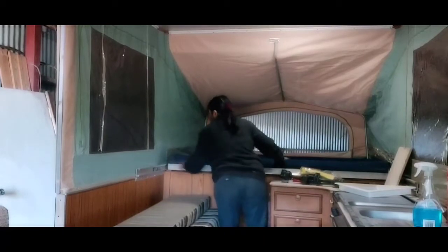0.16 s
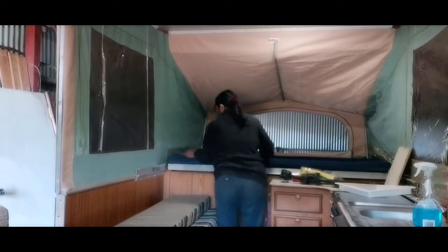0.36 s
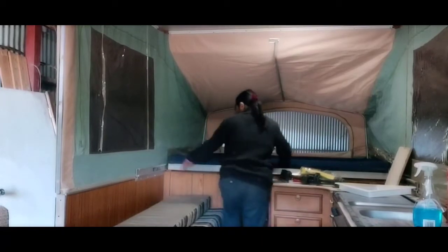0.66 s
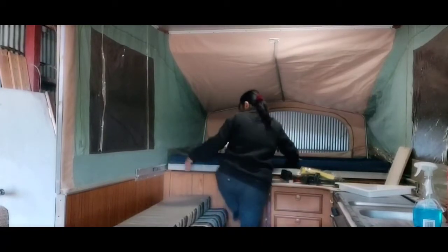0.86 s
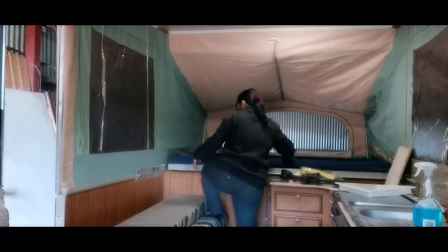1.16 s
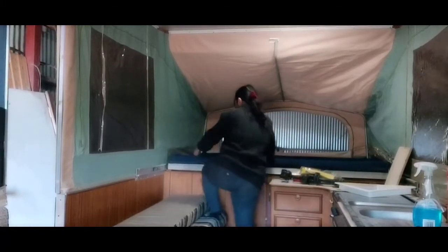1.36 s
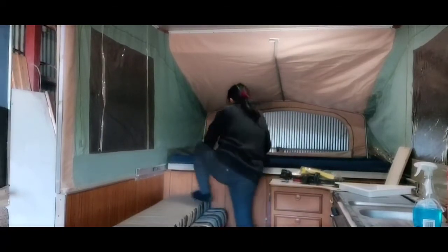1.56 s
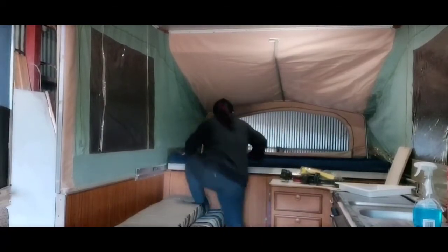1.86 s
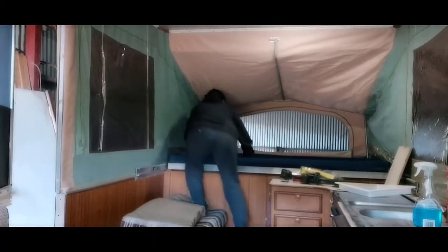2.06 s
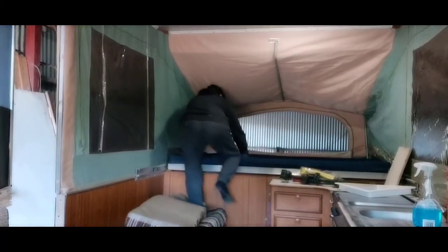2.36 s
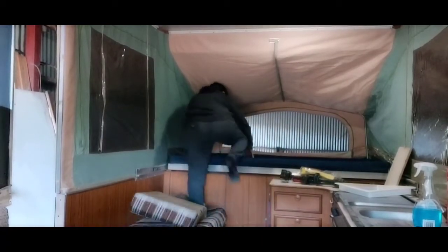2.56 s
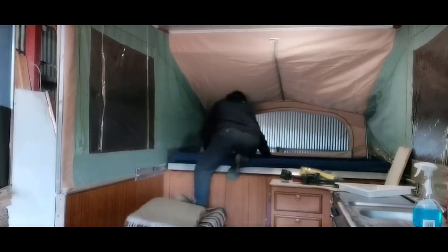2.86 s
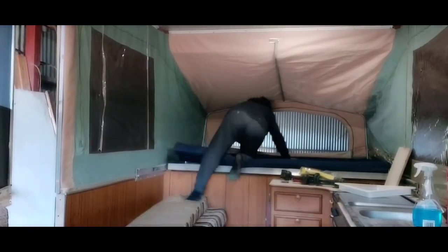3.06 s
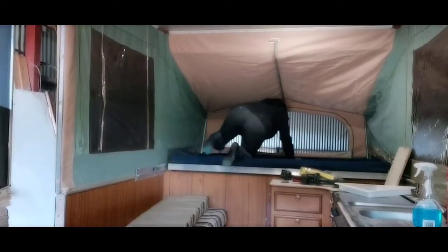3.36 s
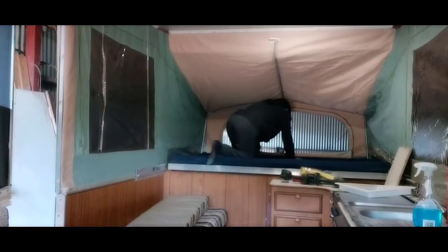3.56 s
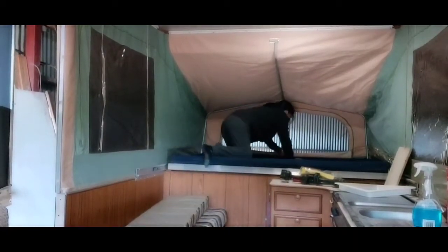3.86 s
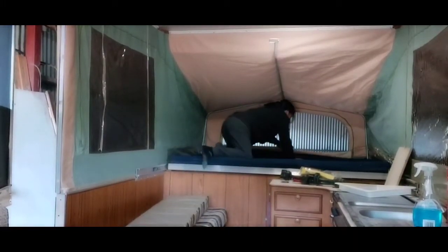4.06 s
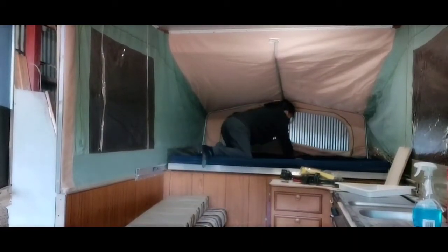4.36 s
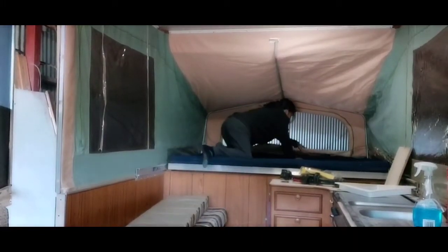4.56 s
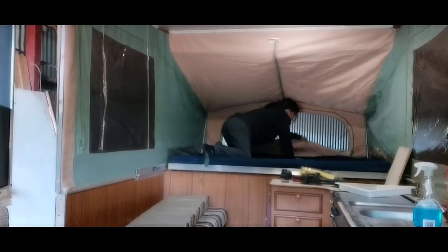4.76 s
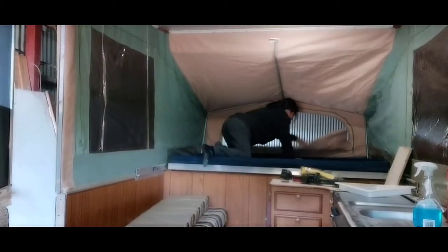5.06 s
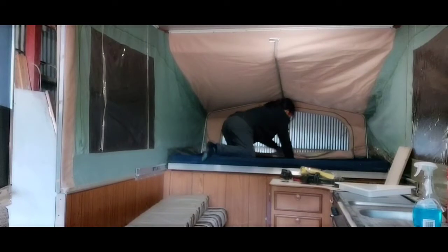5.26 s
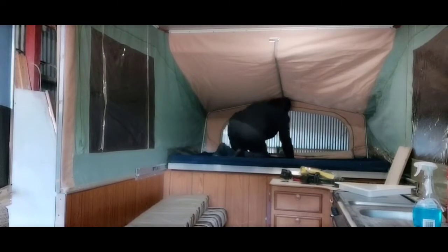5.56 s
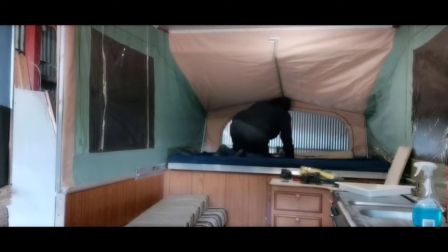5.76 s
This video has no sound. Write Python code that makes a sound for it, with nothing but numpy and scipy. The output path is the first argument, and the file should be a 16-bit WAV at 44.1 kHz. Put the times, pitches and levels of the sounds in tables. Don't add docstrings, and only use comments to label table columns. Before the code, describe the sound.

Knees and hands bump hollow plywood, clothes rustle and fittings snap in a padded cabin, with low wind bursts strongest early on.

```python
import sys
import numpy as np
from scipy import signal
from scipy.fft import rfft, irfft
from scipy.io import wavfile
from scipy.ndimage import uniform_filter1d

SR = 44100
rng = np.random.default_rng(int(sys.argv[2]) if len(sys.argv) > 2 else 0)


def wav_out(sig):
    wavfile.write(sys.argv[1], SR, np.round(np.clip(np.atleast_2d(sig).T, -1, 1) * 32767).astype(np.int16))


def nominal_scale(level):
    x = np.asarray(level, float) / 20
    return 10 ** x


N = 261072
TIME = np.arange(N) / SR
SHARED_BELOW_HZ = 910


def level(x, db):
    return x * nominal_scale(db) / np.sqrt(np.mean(x ** 2))


def band(x, lo_hz, hi_hz, order=2):
    edges_hz = [lo_hz, min(hi_hz, 0.45 * SR)]
    return signal.sosfilt(signal.butter(order, edges_hz, "band", fs=SR, output="sos"), x)


def add(out, sound, start_s):
    i = max(int(start_s * SR), 0)
    out[..., i:i + sound.shape[-1]] += sound[..., :N - i]


def decay(t, t60_s):
    return 1000 ** (-t / t60_s)


def walk(rate_hz):
    hold = int(SR / rate_hz)
    steps = np.repeat(rng.standard_normal(N // hold + 1), hold)
    return 1.3 * uniform_filter1d(uniform_filter1d(steps, hold), hold)[:N]


def diffuse(samples, alike=0.91):
    mid, side = rfft(rng.standard_normal((2, samples)))
    hz = np.arange(len(mid)) * SR / samples
    like = np.clip(alike, 0, 1) / (1 + (hz / SHARED_BELOW_HZ) ** 4)
    mid, side = mid * np.sqrt(1 + like), side * np.sqrt(1 - like)
    return irfft(np.array([mid + side, mid - side]), samples) / np.sqrt(2)


def sparse(per_s, sizes, fade_s):
    clicks = (rng.random(N) < per_s / SR) * sizes
    return signal.lfilter([1], [1, -np.exp(-1 / (fade_s * SR))], clicks)


# peak_s, peak_db, panel_hz
THUMP_BLOWS = [(0.2353, -28.5, 300), (0.258, -24.5, 120), (0.272, -28, 131), (0.301, -29.5, 125),
               (0.321, -37, 136), (0.379, -35, 130), (1.124, -35, 180), (1.143, -22, 170),
               (1.166, -21.5, 150), (1.212, -28, 120), (1.24, -28.5, 118), (1.581, -33, 145),
               (1.938, -46, 172), (1.959, -33.5, 228), (2.61, -22.5, 142), (2.623, -27.5, 135),
               (2.874, -35.5, 140), (2.924, -31, 201), (2.956, -31.5, 161), (3.014, -29.5, 182),
               (3.05, -40, 150), (5.045, -31.5, 168), (3.231, -29, 230), (3.25, -32, 201),
               (2.907, -36, 200), (3.69, -27.5, 174), (3.708, -32, 160), (3.735, -35, 150),
               (3.823, -32, 135), (3.843, -32, 147), (4.017, -32.5, 165), (5.03, -35.5, 200),
               (5.065, -32, 205), (5.346, -29.5, 239), (5.617, -33, 130), (5.578, -40, 120),
               (5.64, -37, 120)]
# mode_hz, level_db, t60_s
BUNK_MODES = [
    (118, -2, 0.18),
    (170, -4, 0.24),
    (274, -10, 0.12),
    (334, -13, 0.21),
    (426, -18, 0.092),
    (623, -34, .04),
    (820, -33, .04),
]


def thumps(own_t60_s=0.07, push_cycles=0.38, bunk_db=-4):
    out, t = np.zeros(N), np.arange(int(0.2 * SR)) / SR
    for peak_s, peak_db, panel_hz in THUMP_BLOWS:
        ring = np.sin(2 * np.pi * panel_hz * t) * decay(t, own_t60_s)
        for mode_hz, mode_db, t60_s in BUNK_MODES:
            detune, spread = rng.standard_normal(2)
            tone = np.sin(2 * np.pi * mode_hz * (1 + 0.052 * detune) * t)
            ring += nominal_scale(mode_db + bunk_db + 3 * spread) * tone * decay(t, t60_s)
        push = np.hanning(int(push_cycles * SR / panel_hz) + 3)
        ring = np.convolve(ring, push)
        add(out, -ring * nominal_scale(peak_db) / np.abs(ring).max(), peak_s - 0.661 / panel_hz)
    return np.array([out, out])


# peak_s, peak_db, swell_s, fade_s, heaviness_db
CLIMBING_CLOTH = [(0, -55.5, .1, .25, 2), (.146, -59.5, 0.22, .12, -1), (.27, -54, .06, 0.3, -1.5),
                  (.38, -55.5, .3, 0.13, 0.5), (.48, -58.5, 0.097, 0.37, 0), (.58, -58, 0.23, 0.1, 0.5),
                  (0.722, -59, 0.1, 0.094, 3.5), (1.165, -49.5, 0.05, 0.099, 4),
                  (1.185, -59, .02, 0.053, 12), (1.37, -65, 0.18, 0.14, 0), (1.53, -61, 0.096, 0.37, -17),
                  (1.62, -56, 0.24, 0.15, -1), (1.687, -51.5, 0.032, 0.083, -13),
                  (1.724, -51, 0.085, 0.057, -8), (2.0, -56, 0.14, 0.061, 4),
                  (2.08, -58.5, 0.044, 0.036, 1), (2.5, -71, 0.2, .4, -3), (2.66, -68, 0.4, 0.069, 4.5),
                  (2.89, -58, .03, .3, -8), (2.97, -46, 0.038, 0.12, 0), (3.23, -48, 0.14, 0.063, -2.5),
                  (3.35, -65.5, .1, 0.072, -7)]
# peak_s, peak_db, swell_s, fade_s, heaviness_db
CRAWLING_CLOTH = [(3.71, -61, 0.025, 0.069, 4), (3.75, -57.5, 0.049, 0.08, 0),
                  (3.86, -58.5, 0.13, 0.055, 5.5), (3.99, -53.5, 0.052, 0.12, 7),
                  (4.21, -60, 0.33, 0.15, 0), (4.31, -53, 0.15, 0.077, 1.5), (4.42, -66.5, .15, 0.13, 0),
                  (4.65, -67, .15, 0.14, -3), (4.55, -56, 0.12, 0.072, 3), (4.77, -60.5, 0.13, 0.16, 0),
                  (4.93, -55, 0.16, 0.25, -0.5), (5.04, -58.5, 0.19, 0.11, 6), (5.24, -52, 0.078, 0.14, 0),
                  (5.375, -49.5, 0.043, .1, 3), (5.42, -39.5, 0.086, 0.091, -1),
                  (5.47, -46, .08, 0.055, -5), (5.6, -60, 0.18, 0.064, -2), (5.74, -57, 0.044, .2, 2),
                  (5.81, -53.5, 0.074, 0.075, 4.5), (5.92, -57, 0.16, .2, -0.5)]


def cloth(heavy_share, offset_db):
    swell_depth_db, still_db, still_heavy_db = 17.5, -73, 4
    roundness = 1.11
    peak_s, peak_db, swell_s, fade_s, heavy_db = np.transpose(CLIMBING_CLOTH + CRAWLING_CLOTH)[..., None]
    coarse_time = TIME[::64]
    t = coarse_time - peak_s
    away = np.where(t < 0, -t / np.maximum(swell_s, 0.01), t / np.maximum(fade_s, 0.01))
    moves_db = peak_db + heavy_share * heavy_db - swell_depth_db * away ** roundness
    power = np.sum(nominal_scale(2 * moves_db), axis=0) + nominal_scale(2 * (still_db + heavy_share * still_heavy_db))
    return np.interp(TIME, coarse_time, 10 * np.log10(power) + offset_db)


# centre_hz, level_db
CREASE_RINGS = [
    (1050, -14),
    (1500, -10.5),
    (2000, -10),
    (2500, -9.5),
    (2900, -9.5),
    (3600, -11.5),
    (4900, -13),
    (6000, -13),
]


def rustle(grain_db=2.5, smooth_db=8.0, patchy_db=1.5):
    drag_db = cloth(0, 0)
    folds_db = cloth(0.92, 0) - drag_db
    weave_db = cloth(-0.28, -0.5) - drag_db
    clicks = sparse(900, nominal_scale(grain_db * rng.exponential(size=N)), 0.0043)
    catching = level(clicks, 0) + nominal_scale(smooth_db)

    def fibres():
        noise = diffuse(N, alike=1.0) * catching * nominal_scale(patchy_db * walk(25))
        return signal.lfilter([1], [1, -0.6], noise)

    out = level(band(fibres(), 990, 2750, order=4), -3.0) * nominal_scale(folds_db)
    out += level(band(fibres(), 2050, 6550, order=3), -3.0)
    out += level(band(fibres(), 6400, 21200), -0.88) * nominal_scale(weave_db)
    flip_db = -5 + 0.12 * (drag_db + 52.5)
    for centre_hz, crease_db in CREASE_RINGS:
        burst = sparse(50, nominal_scale(2.5 * rng.standard_normal(N)), 0.009)
        noise = rng.standard_normal((2, N)) * burst
        fleck = level(band(noise, centre_hz / 1.04, centre_hz * 1.04, order=1), crease_db)
        out += fleck * nominal_scale(folds_db * (centre_hz < 2300) + flip_db)
    return out * nominal_scale(drag_db)


# left_late_s, right_late_s, level_db
WALL_ECHOES = [
    (.0021, .0024, -5),
    (.0047, 0.0038, -5),
    (.0073, .0080, -8),
    (0.0116, 0.011, -10),
]


def cabin(x):
    out = x.copy()
    for *late_s, db in WALL_ECHOES:
        sway_s = 0.0002 * walk(1.5)
        echo = [np.interp(TIME - s - sway_s, TIME, port) for s, port in zip(late_s, x)]
        out += nominal_scale(db) * np.array(echo)
    return out / np.sqrt(1 + sum(nominal_scale(2 * db) for *_, db in WALL_ECHOES))


# start_s, peak_db, centre_hz, treble_share_db, t60_s
HARD_SNAPS = [(0.226, -33, 767, -45, 0.1), (.229, -41.5, 2980, -12, .06), (1.142, -43, 1100, -6, 0.068),
              (1.159, -33, 1980, -11, 0.089), (1.179, -42, 1700, -16, 0.056), (1.99, -35, 3600, -31, 0.046),
              (2.064, -32, 3100, -32, 0.05), (2.486, -55, 1500, 0, 0.051), (2.601, -45, 810, -29, 0.062),
              (2.647, -50, 5600, -22, 0.063), (2.873, -53, 813, 10, 0.036), (2.958, -23, 3700, -39, 0.05),
              (2.958, -35, 1090, -40, 0.066), (3.119, -55.5, 947, 14, 0.04), (3.705, -49, 980, -29, 0.052),
              (3.807, -51.5, 1050, 6, 0.035), (3.947, -48, 1800, -24, 0.08), (3.964, -45, 2300, -17, .06),
              (3.977, -40, 1470, -19, 0.04), (4.008, -42, 2200, -13, 0.056), (4.128, -50, 1510, -24, 0.04),
              (4.224, -65, 1570, 0, 0.063), (4.743, -45.5, 3300, -4, 0.065), (4.787, -45, 2580, -6, 0.12),
              (5.013, -40.5, 1150, -19, 0.12), (5.2, -47, 3030, -14, 0.06), (5.346, -41.5, 2300, -33, 0.09),
              (5.728, -53, 2840, 3, 0.074), (5.791, -41.5, 2880, -15, 0.076)]
# start_s, peak_db, centre_hz, treble_share_db, t60_s
DULL_KNOCKS = [(1.25, -49, 330, -45, 0.11), (3.3, -47.5, 690, -30, .15), (4.3, -50, 650, -30, 0.1),
               (3.835, -47, 640, -30, 0.19), (3.975, -50, 690, -45, 0.31), (.27, -50, 690, -45, 0.46),
               (.5, -51, 690, -45, 0.58), (1.96, -47.5, 690, -45, .2), (1.735, -43.5, 550, -43, 0.08),
               (1.745, -42, 260, -43, 0.079), (2.27, -40, 160, -45, 0.11), (1.95, -41.5, 360, -45, 0.24),
               (2.988, -38.5, 390, -45, 0.19), (3.225, -45, 550, -45, 0.19), (4.91, -43, 243, -45, 0.11),
               (2.603, -41.5, 390, -45, .06), (4.535, -41, 202, -45, 0.17), (4.568, -40.5, 235, -45, 0.066),
               (3.7, -41.5, 340, -44.5, 0.16), (1.153, -37, 610, -45, 0.15), (5.885, -41, 270, -45, 0.12)]


def snaps(width=1.385, tail_db=-18, tail_t60_s=0.31):
    out, t = np.zeros((2, N)), np.arange(int(0.25 * SR)) / SR
    for start_s, peak_db, centre_hz, treble_db, t60_s in HARD_SNAPS + DULL_KNOCKS:
        noise = diffuse(len(t))
        body = band(noise, centre_hz / width, centre_hz * width, order=1 + (centre_hz < 700))
        edge = band(noise, 1700, 17000)
        colour = level(body, 0) + level(edge, treble_db + 0.5)
        fade = decay(t, max(t60_s, 0.005)) + nominal_scale(tail_db) * decay(t, tail_t60_s)
        rise = 1 - np.exp(-t / (0.001 + 0.87 / centre_hz))
        add(out, nominal_scale(peak_db - 3.0) * colour * fade * rise, start_s)
    return out


# start_s, pitch_hz, level_db, t60_s
FITTING_RINGS = [
    (.2275, 1050, -27, 0.02),
    (.2255, 803, -29.5, 0.034),
    (0.2255, 1820, -28.5, 0.024),
    (2.9575, 820, -37.5, 0.047),
    (2.9587, 1750, -38.5, 0.036),
    (2.9, 870, -47.5, .03),
    (5.3477, 510, -36.5, 0.027),
    (2.964, 2690, -40.5, 0.09),
    (2.9597, 3480, -36, 0.03),
]
# start_s,
# pitch_hz, level_db, t60_s
SHORT_RINGS = [(5.3505, 1700, -42, 0.027), (5.356, 1970, -42, .02), (5.368, 2700, -41, .02),
               (5.375, 2800, -38, .025), (5.381, 2750, -42, .02), (5.391, 2700, -36, .025),
               (5.4, 1700, -37, .02), (5.411, 2250, -41, .02), (5.417, 3300, -39, .02),
               (5.423, 2100, -40, .02), (5.425, 4700, -44, .02), (5.449, 2000, -46, .03),
               (4.791, 1550, -46, 0.044), (4.3, 2200, -46, 0.046), (5.042, 1800, -46, 0.027),
               (4.972, 1280, -50, .04), (2.974, 3150, -46, .06), (1.162, 3050, -39.5, .03),
               (1.168, 2200, -42, 0.036), (1.164, 1500, -43, .03), (1.188, 1200, -41, .03),
               (.243, 1400, -45, 0.035), (.259, 1700, -51, .05), (.2265, 330, -32, 0.026),
               (.2275, 520, -31, 0.028), (5.364, 300, -38, .02), (4.29, 2700, -49, .03),
               (4.545, 2350, -49.5, .03), (5.1, 2100, -48, 0.033), (5.433, 3300, -44, 0.018),
               (5.44, 6900, -46, .02), (1.972, 900, -46, 0.034)]


def rings():
    out, t = np.zeros((2, N)), np.arange(int(0.25 * SR)) / SR
    for start_s, pitch_hz, db, t60_s in FITTING_RINGS + SHORT_RINGS:
        rise = np.sin(np.pi / 2 * np.minimum(t * pitch_hz / 1.95, 1)) ** 2
        port_phase = np.array([[0], [pitch_hz / 2500]])
        tone = np.sin(2 * np.pi * pitch_hz * t + port_phase)
        add(out, nominal_scale(db + 2.0) * tone * decay(t, t60_s) * rise, start_s)
    return out


# start_s, length_s, pitch_hz, level_db
JOINT_SQUEAKS = [(0.302, .04, 2700, -52), (0.305, 0.027, 3450, -55), (0.678, 0.045, 967, -53),
                 (0.718, 0.03, 980, -54.5), (0.716, 0.023, 1880, -54.5), (3.018, 0.023, 905, -49),
                 (1.5, 0.076, 6100, -60), (1.6, .06, 5900, -56), (4.018, 0.031, 900, -54),
                 (4.122, 0.018, 1495, -57), (4.216, 0.019, 1520, -53), (4.279, 0.032, 2750, -54),
                 (4.618, .02, 11400, -63), (4.908, 0.021, 503, -50), (4.96, 0.043, 1440, -55),
                 (5.249, 0.0186, 1016, -49), (5.32, .05, 11900, -61.5), (5.731, 0.061, 2800, -54),
                 (5.78, 0.043, 1040, -54), (5.848, .05, 1453, -57.5), (5.887, .012, 13900, -54),
                 (5.735, .03, 5000, -57)]


def squeaks():
    out = np.zeros(N)
    for start_s, length_s, pitch_hz, db in JOINT_SQUEAKS:
        n = int(length_s * SR)
        half_width_hz = 25 + pitch_hz / 320
        noise = rng.standard_normal(n + 2000)
        song = band(noise, pitch_hz - half_width_hz, pitch_hz + half_width_hz, order=1)[2000:]
        add(out, level(song, db - 2) * np.hanning(n) ** 0.13, start_s)
    return np.array([out, np.roll(out, 5)])


# start_s, length_s, pitch_hz, glide_hz, level_db
ZIP_WHISTLES = [
    (5.016, .022, 11350, 0, -70),
    (5.049, .014, 11250, 30, -61),
    (5.063, .014, 11270, 0, -70),
    (5.077, .03, 11190, 150, -63),
    (5.162, .025, 11130, 150, -65),
    (5.187, .01, 11400, 0, -69),
    (5.2, .012, 11200, 60, -61),
]


def whistles(waver_db=2.5):
    out = np.zeros(N)
    for start_s, length_s, pitch_hz, glide_hz, db in ZIP_WHISTLES:
        t = np.arange(int(length_s * SR)) / SR
        cycles = (pitch_hz + glide_hz * t / length_s / 2) * t
        shape = np.hanning(len(t)) ** 0.4
        add(out, nominal_scale(db + 7.0) * shape * np.sin(2 * np.pi * cycles), start_s)
    out = out * nominal_scale(waver_db * walk(250))
    return np.array([out, np.roll(out, 5)])


# time_s, level_db
SHELL_ROCKING = [(0.0, -44), (1.05, -50.5), (1.2, -29.5), (1.32, -49), (1.63, -44), (1.75, -54),
                 (1.96, -39.5), (2.16, -50), (2.45, -52), (2.84, -52.5), (2.93, -45.5), (3.26, -45),
                 (3.5, -63.5), (3.71, -46.5), (3.99, -49), (4.88, -52), (5.1, -46.5), (5.92, -49.5)]


def rocking():
    time_s, load_db = np.transpose(SHELL_ROCKING)
    boom_db = np.interp(TIME, time_s, load_db)
    panel_db = -54 + 0.6 * (boom_db + 48.5)
    shake = diffuse(N, alike=0.95) * nominal_scale(2.5 * walk(70))
    boom = level(band(shake, 69.5, 199.0), -3.0) * nominal_scale(boom_db)
    panels = level(band(shake, 128, 435), -3.5) * nominal_scale(panel_db)
    return boom + panels


# peak_s, peak_db, pitch_hz
LEFT_PORT_EDDIES = [(0.03, -30, 98), (0.207, -35, 98), (0.692, -34.5, 139.5), (0.793, -33.5, 108),
                    (0.997, -25.5, 111.6), (1.24, -22.5, 120), (1.283, -21, 131), (1.315, -22, 97),
                    (1.327, -23, 165), (1.335, -7, 139.5), (1.348, -6.5, 152.5), (1.364, -15, 115),
                    (1.43, -24, 114), (1.453, -28, 120), (1.474, -17.5, 131), (1.489, -14.5, 165),
                    (1.503, -19.5, 109.7), (1.544, -24.5, 134), (1.612, -21, 143), (1.699, -24.5, 87),
                    (1.723, -17, 164), (1.751, -33, 175), (3.32, -33.5, 110), (3.426, -22.5, 100),
                    (4.543, -31, 158), (4.996, -23.5, 141), (5.323, -36, 126), (5.421, -27.5, 134),
                    (5.575, -39, 124)]
# peak_s, peak_db, pitch_hz
RIGHT_PORT_EDDIES = [(0.104, -28, 131), (0.366, -28.5, 114), (0.442, -29, 102), (0.497, -31, 126),
                     (0.703, -33, 129), (0.751, -37.5, 139), (0.919, -33, 162), (0.958, -30, 133),
                     (1.033, -26, 102), (1.054, -21.5, 118), (1.078, -25.5, 122), (1.22, -16, 118),
                     (1.3, -33, 130), (1.32, -34, 140), (1.462, -34, 100), (1.496, -25, 120.5),
                     (1.529, -34, 130), (1.556, -28, 130), (1.706, -31, 110), (1.574, -22, 111),
                     (1.588, -26, 107), (1.638, -24.5, 98), (1.819, -24, 107.4), (1.999, -33, 126),
                     (2.167, -34, 105), (2.274, -36.5, 156), (2.314, -32, 116), (2.5, -33, 111),
                     (3.186, -41, 124), (3.628, -35.5, 125), (3.753, -28, 132), (3.926, -40, 116),
                     (4.24, -36, 150.4), (5.63, -38, 105), (5.7, -40, 105)]


def draught(eddies, cycles=0.47, flutter_db=-54, wake_db=-14):
    out, t = np.zeros(N), np.arange(-1500, 1500) / SR
    for peak_s, peak_db, pitch_hz in eddies:
        phase, twist = rng.uniform(0, 2 * np.pi, 2)
        edge_db = -22 + 0.2378 * (pitch_hz - 115) + 0.5 * (peak_db + 26.0)
        width_s = np.where(t < 0, cycles, 1.47 * cycles) / pitch_hz
        swing = np.exp(-(t / width_s) ** 2) * np.cos(2 * np.pi * 0.9 * pitch_hz * t + phase)
        edge_shape = np.exp(-(t * pitch_hz / 0.27) ** 2)
        edge = edge_shape * np.cos(2 * np.pi * 1.57 * pitch_hz * (t + 0.0022) + twist)
        add(out, nominal_scale(peak_db) * (swing + nominal_scale(edge_db) * edge), peak_s + t[0])
    gust = np.sqrt(np.abs(uniform_filter1d(out ** 2, 5000)))
    flutter = level(band(rng.standard_normal(N), 70, 190) * nominal_scale(4 * walk(30)), 0)
    return out + flutter * (nominal_scale(flutter_db) + nominal_scale(wake_db) * gust)


# pitch_hz, density_db (per Hz)
AIR_SPECTRUM = [(30, -51), (60, -19), (100, -2.5), (150, -8), (300, -18), (450, -26), (750, -29),
                (1640, -30.5), (3000, -40), (5000, -44.5), (15500, -45)]


def air():
    table_hz, table_db = np.transpose(AIR_SPECTRUM)
    hz = np.arange(N // 2 + 1) * SR / N
    gain = nominal_scale(np.interp(np.log(hz + 1), np.log(table_hz), table_db))
    return level(irfft(rfft(diffuse(N, alike=1.0)) * gain, N), -48.5 - 4)


def scene():
    bunk = thumps() + snaps() + rings()
    small_sounds = squeaks() + whistles()
    wind = np.array([draught(LEFT_PORT_EDDIES), draught(RIGHT_PORT_EDDIES)])
    return bunk + cabin(rustle()) + small_sounds + rocking() + wind + air()


def low_pass(x):
    return signal.sosfilt(signal.butter(12, 15250, fs=SR, output="sos"), x)


def record(dry):
    top_cut = signal.ellip(12, 0.2, 60, 15560, fs=SR, output="sos")
    bass_cut = signal.butter(2, 62, "high", fs=SR, output="sos")
    mix = signal.sosfilt(bass_cut, signal.sosfilt(top_cut, dry))
    return low_pass(mix)


dry = scene()
out = record(dry)
wav_out(out)
```